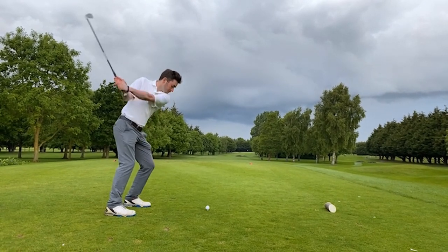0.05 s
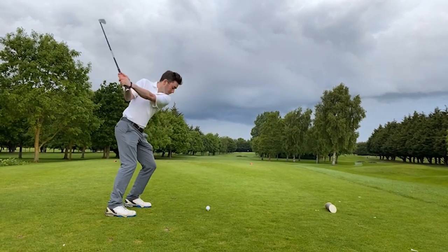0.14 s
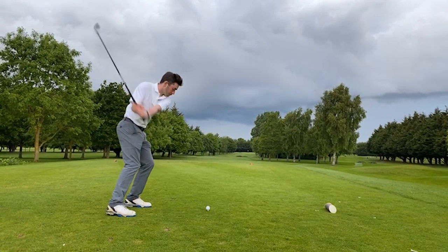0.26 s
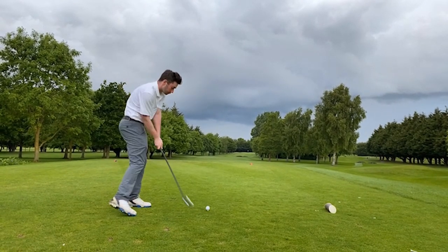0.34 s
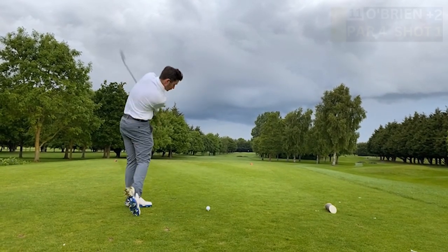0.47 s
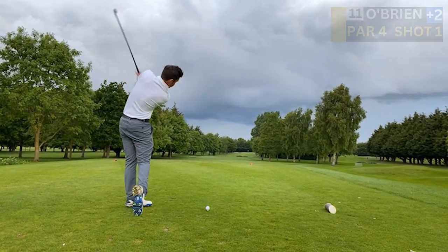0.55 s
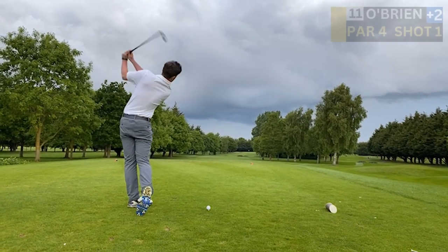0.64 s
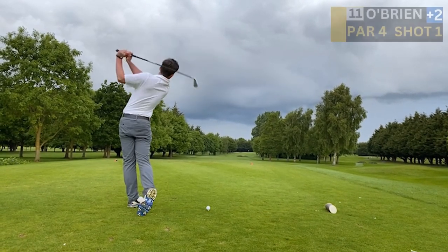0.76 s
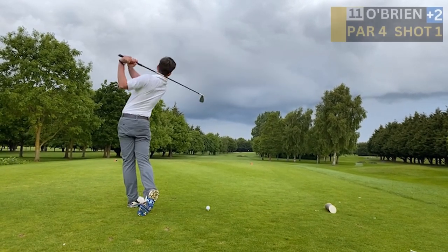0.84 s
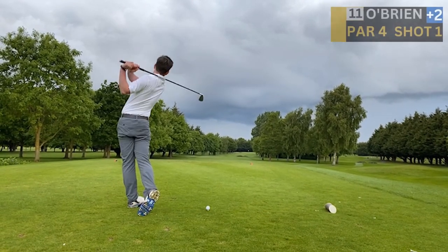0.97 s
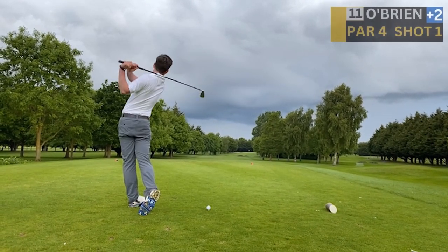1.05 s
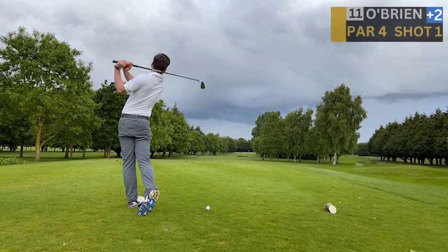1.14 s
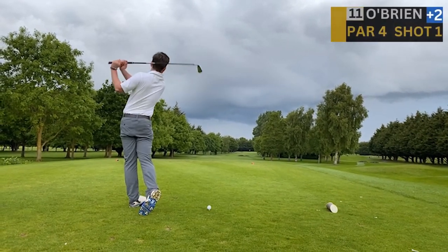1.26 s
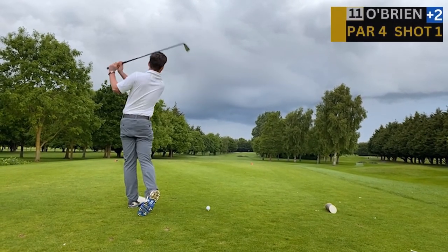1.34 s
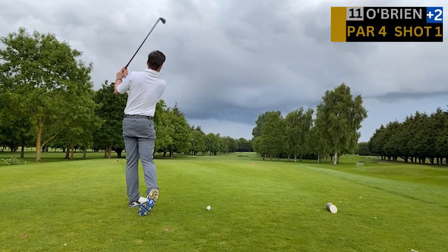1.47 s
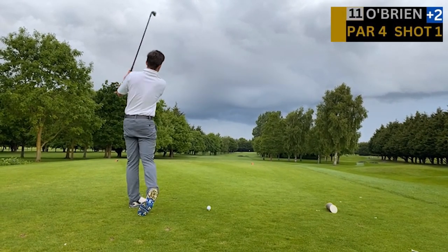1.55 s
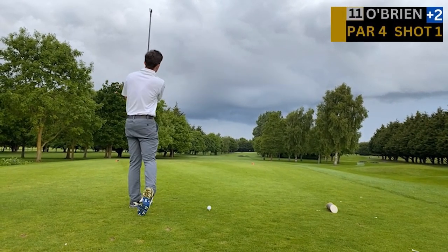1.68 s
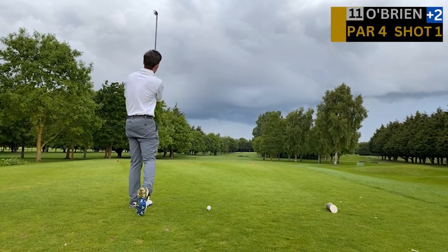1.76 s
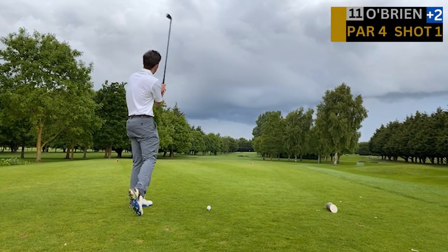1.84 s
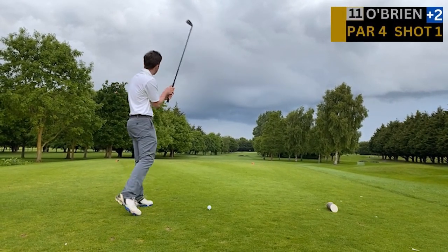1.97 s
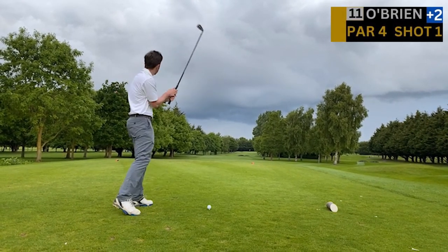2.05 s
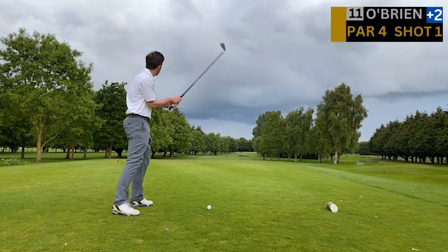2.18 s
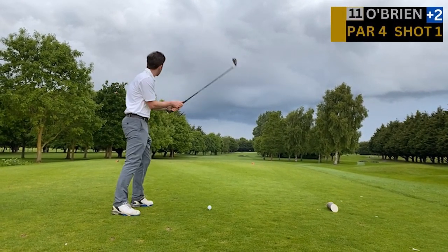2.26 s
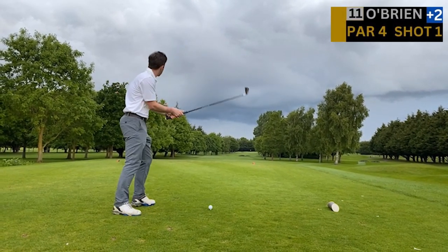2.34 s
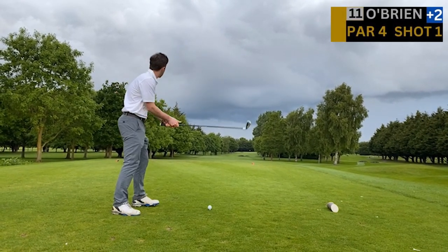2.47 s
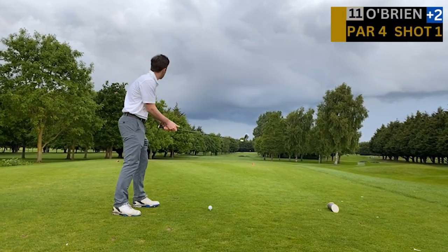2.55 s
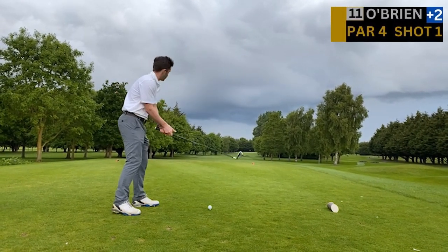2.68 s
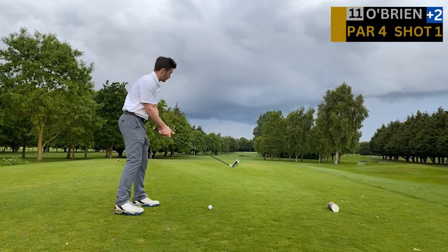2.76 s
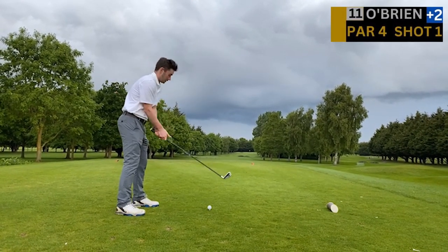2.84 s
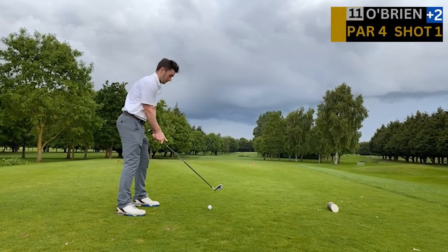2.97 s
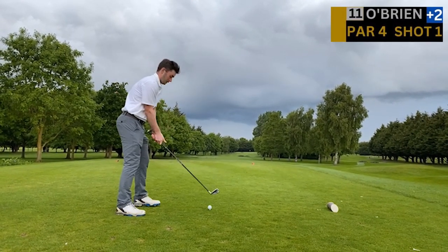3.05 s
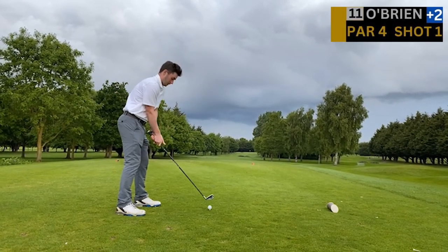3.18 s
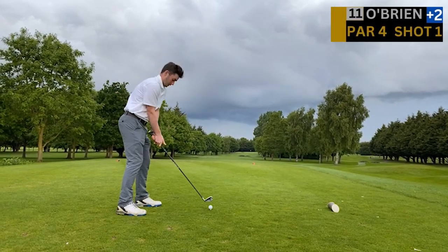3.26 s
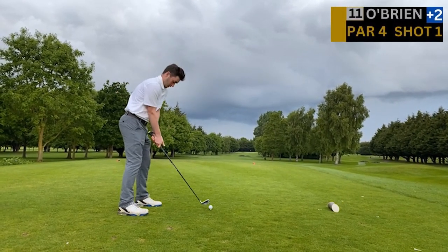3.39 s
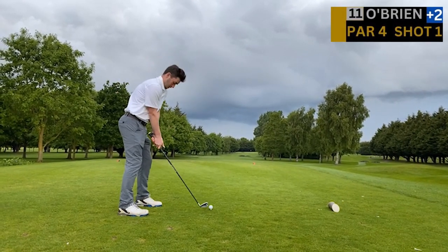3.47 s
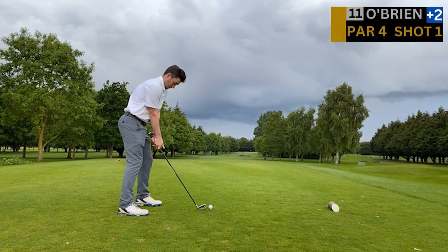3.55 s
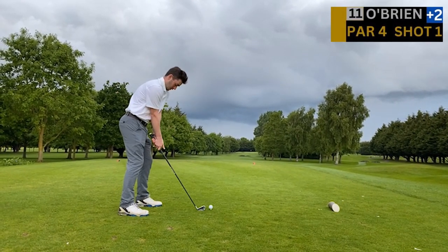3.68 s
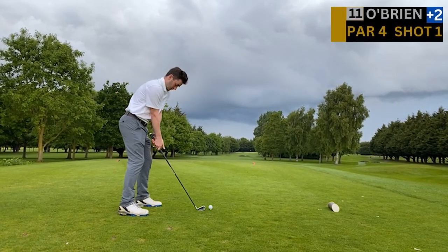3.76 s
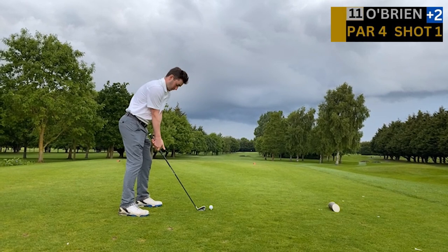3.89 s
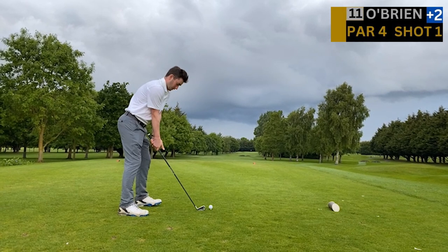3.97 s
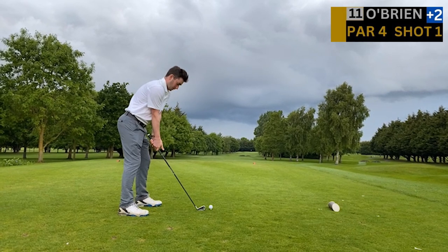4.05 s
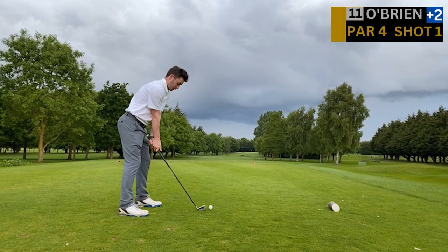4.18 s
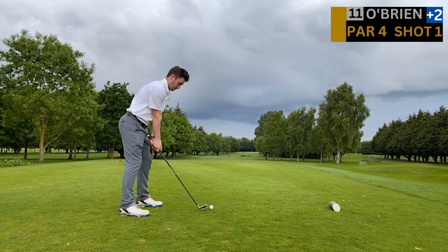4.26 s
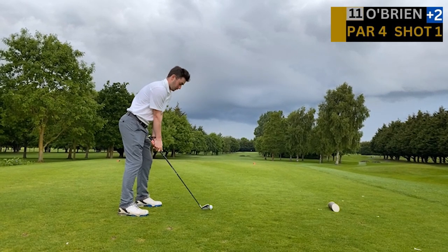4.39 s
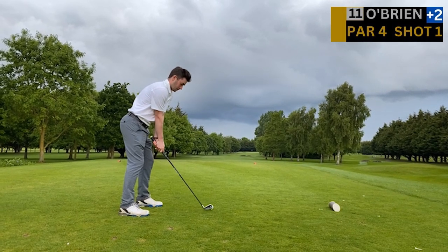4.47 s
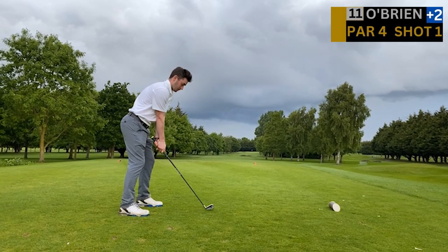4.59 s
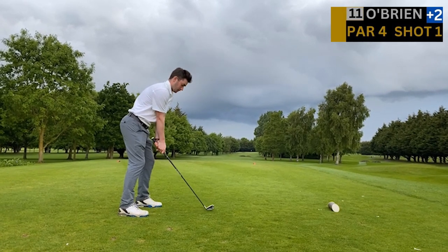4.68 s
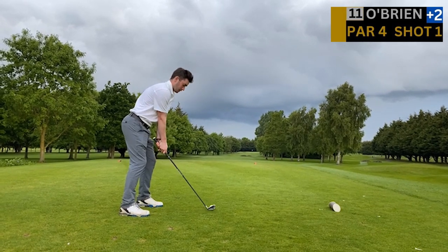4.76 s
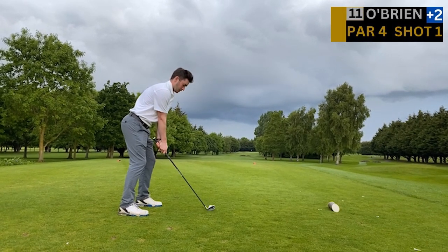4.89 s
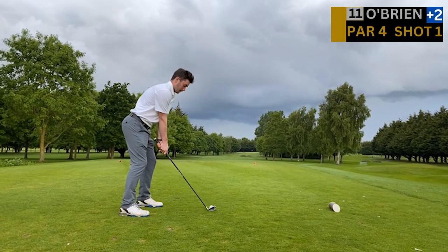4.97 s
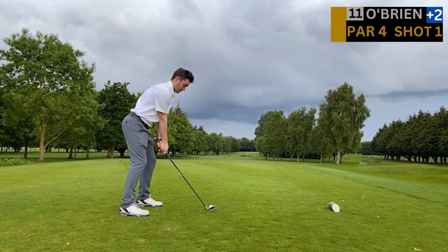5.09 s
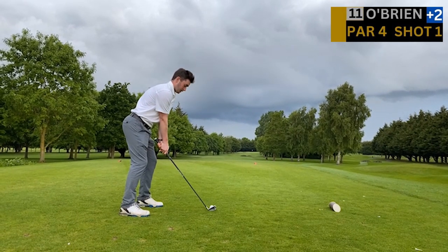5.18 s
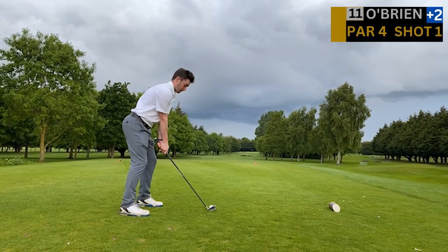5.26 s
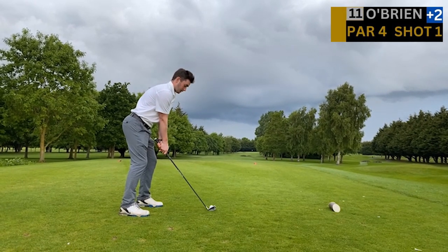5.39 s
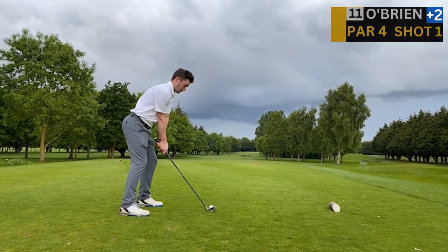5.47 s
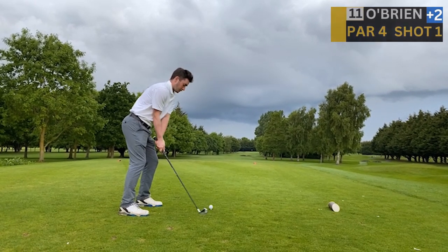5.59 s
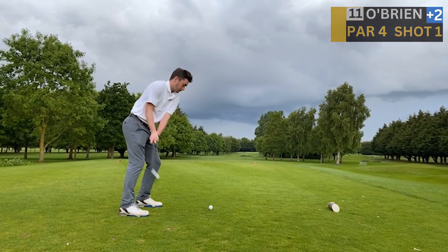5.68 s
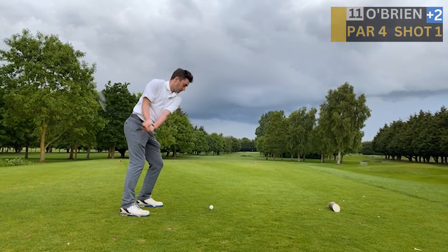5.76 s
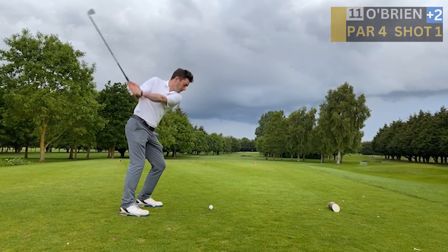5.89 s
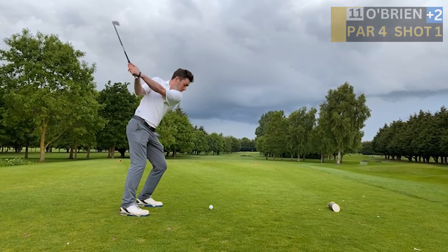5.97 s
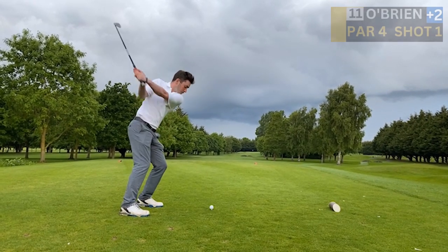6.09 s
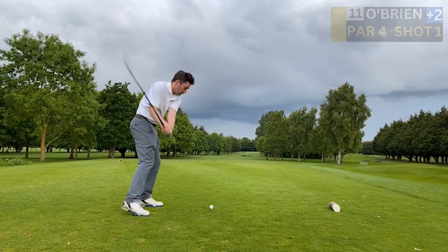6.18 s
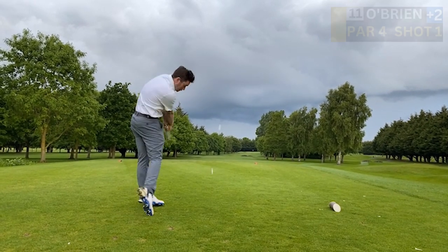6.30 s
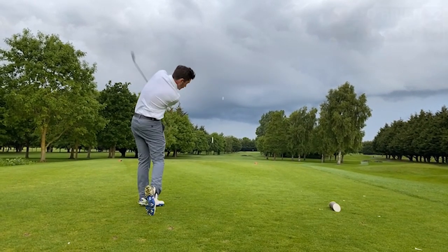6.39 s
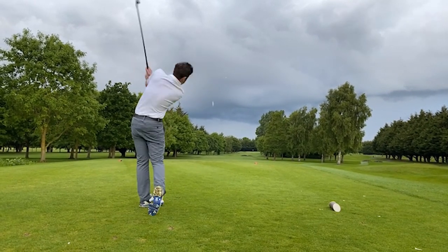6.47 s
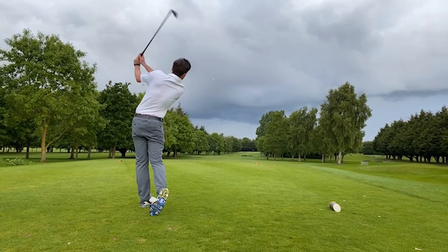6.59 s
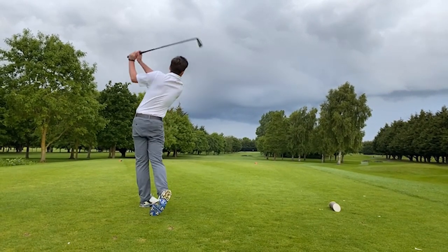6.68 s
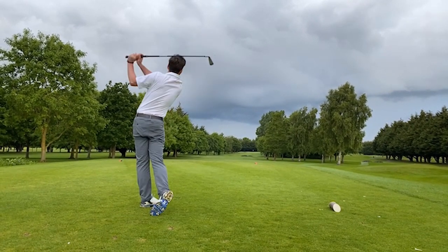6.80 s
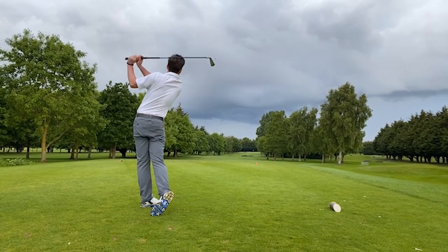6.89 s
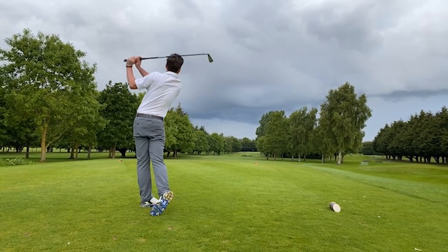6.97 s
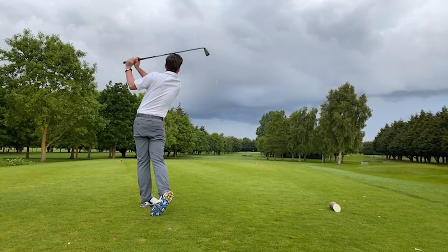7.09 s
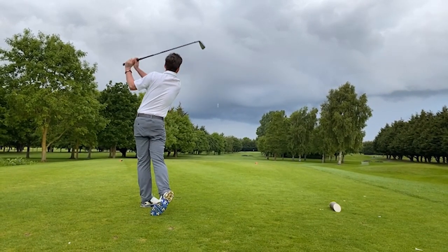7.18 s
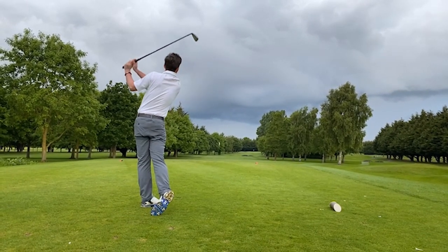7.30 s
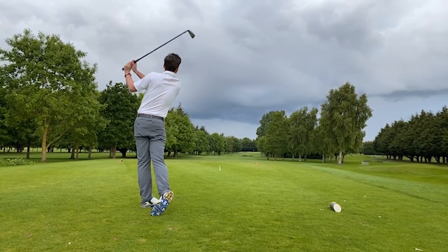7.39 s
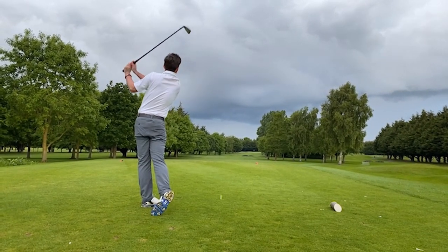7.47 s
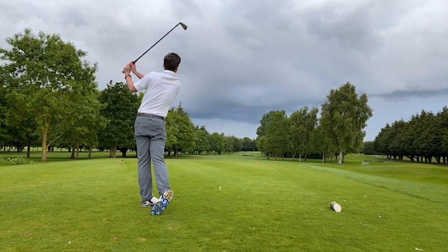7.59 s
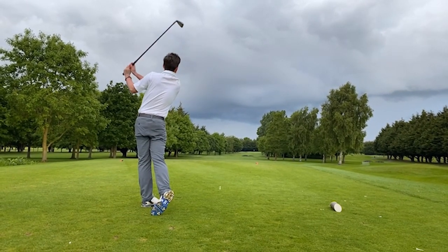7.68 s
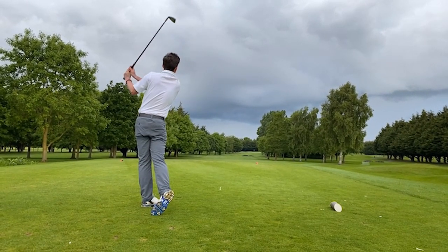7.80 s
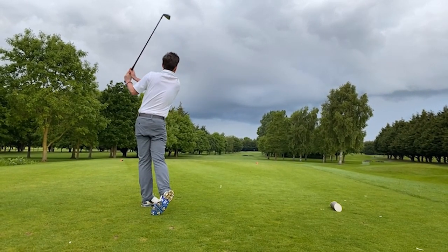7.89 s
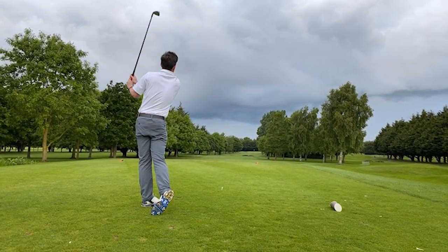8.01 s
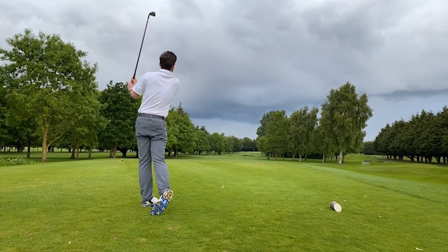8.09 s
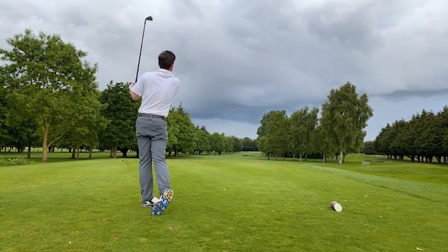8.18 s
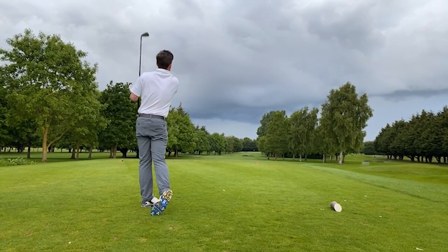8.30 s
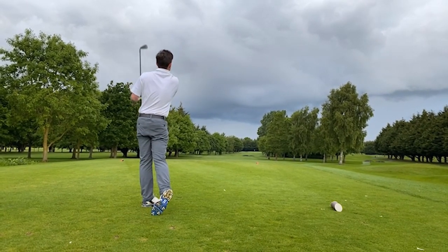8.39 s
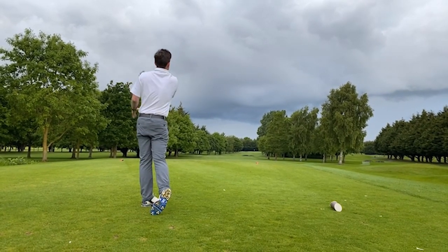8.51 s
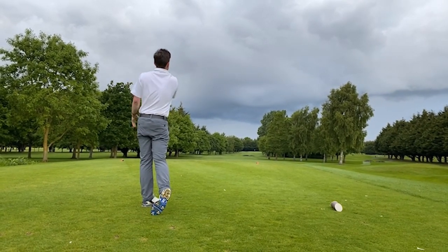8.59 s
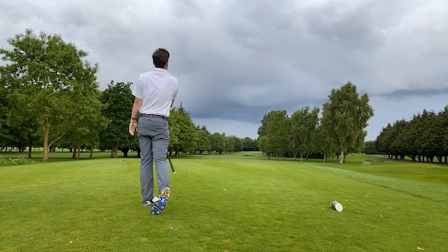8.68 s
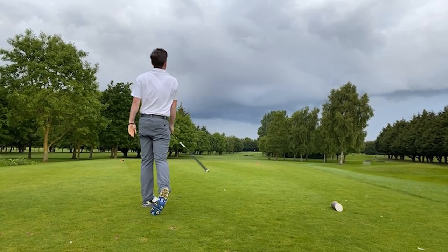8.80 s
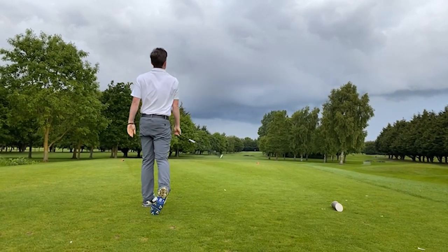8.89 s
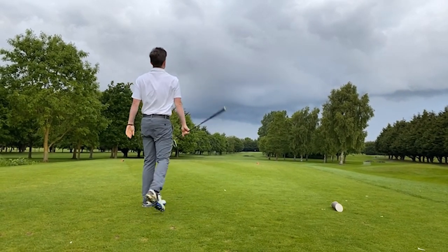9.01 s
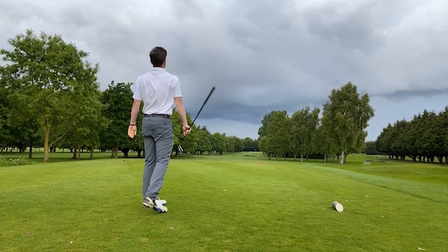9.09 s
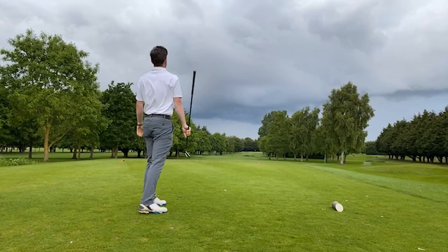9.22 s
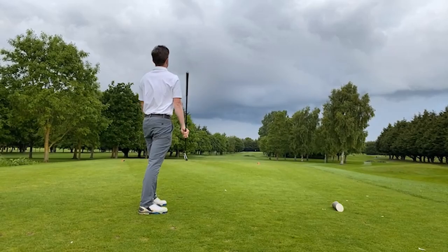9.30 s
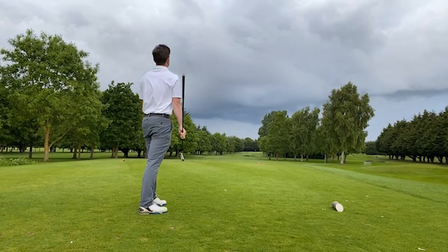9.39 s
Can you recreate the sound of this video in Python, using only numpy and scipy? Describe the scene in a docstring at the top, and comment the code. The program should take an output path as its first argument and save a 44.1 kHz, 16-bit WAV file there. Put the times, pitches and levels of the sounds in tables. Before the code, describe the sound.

Wind rumbles at the microphone over a birdsong-filled golf course; a brushed practice swing comes first, then a sharp iron strike with a short woody echo.

```python
"""Golf practice swing and iron shot

A golfer's practice swing brushes the turf, then an iron strikes a ball on a tree-lined course.
Wind is resonant low noise plus flickering leaf hiss; songbirds are bent sines smeared by the trees.
Each swing is a noise swell with a moving comb; turf, cloth and joints are short noise bursts.
The blow is a set of decaying modes with dull late copies and a grainy echo from the trees.
"""
import sys
import numpy as np
from scipy import signal
from scipy.io import wavfile
from scipy.ndimage import uniform_filter1d

SR = 44100
rng = np.random.default_rng(int(sys.argv[2]) if len(sys.argv) > 2 else 0)


def inscribe(sig):
    """Save sig as 16-bit PCM at rate SR to the path in sys.argv[1].

    A 1-D sig is mono; a 2-D sig holds one channel per row.
    Samples are clipped to [-1, 1] before scaling.
    """
    pcm = np.round(np.clip(np.atleast_2d(sig).T, -1, 1) * 32767)
    wavfile.write(sys.argv[1], SR, pcm.astype(np.int16))


N = 416744
T = np.arange(N) / SR


def undb(db):
    """Amplitude of a level in dB."""
    return 10 ** (np.asarray(db) / 20)


def unit(x):
    """Scale to rms 1."""
    return x / np.sqrt(np.mean(x ** 2))


def band(x, hz, width_hz):
    """Two-pole resonance, gain 1 at the centre."""
    return signal.lfilter(*signal.iirpeak(hz, hz / width_hz, SR), x)


def steep(x, hz, width_hz):
    """The same resonance twice, for steep skirts; rms 1."""
    return unit(band(band(x, hz, width_hz), hz, width_hz))


def noise():
    """White noise for the whole scene."""
    return rng.standard_normal(N)


def walk(rate_hz):
    """Random levels held 1 / rate_hz seconds and slewed twice; spread 1."""
    hold = int(SR / rate_hz)
    steps = np.repeat(rng.standard_normal(N // hold + 1), hold)
    return unit(uniform_filter1d(uniform_filter1d(steps, hold), hold)[:N])


def add(out, start_s, x):
    """Mix x into out at start_s."""
    i = int(start_s * SR)
    out[i:i + len(x)] += x[:N - i]


# wind strength before trims: (time [s], rumble level [dB], upper rumble level [dB], leaf level [dB])
WIND_LEVELS = [(0.0, -44, -45.5, -62.5), (0.37, -45, -45, -60), (0.73, -44.5, -50.5, -60),
               (1.32, -49.5, -54, -61.5), (1.66, -55, -58, -63), (2.16, -53, -59, -62),
               (2.66, -56, -57.5, -63), (3.92, -57, -58.5, -63.5), (5.0, -52, -55.5, -64),
               (5.31, -54.5, -52.5, -63.5), (6.29, -53, -53.5, -62), (6.84, -54.5, -56.5, -63.5),
               (7.21, -51, -55.5, -63.5), (7.53, -52.5, -50, -64), (8.13, -54.5, -54, -64),
               (8.42, -54.5, -51, -62), (8.95, -51, -51.5, -60), (9.45, -55, -52, -62)]
# low eddy resonances: (centre [Hz], first-pass width [Hz], relative level [dB])
RUMBLE_MODES = [(52, 20, -4), (70, 35.8, 0)]
# upper eddy resonances: (centre [Hz], first-pass width [Hz], relative level [dB])
BUFFET_MODES = [(118.3, 51, 3.5), (171, 61, -10.5)]
# leaf hiss spectrum: (frequency [Hz], relative density [dB per Hz])
LEAF_SPECTRUM = [(130, -29), (220, -0.5), (314, -14), (389, 0.5), (536, -9), (898, -6.5), (1150, -15),
                 (2110, -27), (2760, -24.5), (6030, -34), (7880, -30.5), (8930, -36.5), (11700, -40),
                 (15500, -60.5)]


def eddies(modes):
    """Noise through a sum of low resonances; rms 1."""
    out = 0
    for hz, width_hz, db in modes:
        out = out + undb(db) * unit(band(band(noise(), hz, width_hz), hz, 1.4 * width_hz))
    return unit(out)


def wind():
    """Eddies at the microphone port give two steep low bands; leaves hiss in third-octaves that flicker alone."""
    s, *columns = np.transpose(WIND_LEVELS)
    low_db, upper_db, leaf_db = (np.interp(T, s, c) for c in columns)
    hz, density_db = np.transpose(LEAF_SPECTRUM)
    leaves = 0
    for centre_hz in 230 * 2 ** np.arange(0, 6.1, 1 / 3):
        # far treble hardly follows the gusts
        gust = np.clip(1.3 - 0.29 * np.log2(centre_hz / 230), 0, 1)
        level_db = np.interp(np.log(centre_hz), np.log(hz), density_db)
        level_db = level_db + gust * (leaf_db - leaf_db.mean()) + 1.4 * walk(9)
        width_hz = centre_hz / 3
        leaves = leaves + undb(level_db) * band(band(noise(), centre_hz, width_hz), centre_hz, width_hz)
    low = eddies(RUMBLE_MODES) * undb(low_db + 4.5)
    upper = eddies(BUFFET_MODES) * undb(upper_db + 2.5)
    return low + upper + unit(leaves) * undb(leaf_db.mean() - 0.57)


def whistle(length_s, hz, rough_hz, edge_s):
    """A sine bent through three pitches; rough_hz shakes the pitch quickly."""
    u = np.linspace(-1, 1, int(length_s * SR))
    start, middle, end = hz
    pitch_hz = middle + (end - start) / 2 * u + ((start + end) / 2 - middle) * u ** 2
    shake = unit(uniform_filter1d(rng.standard_normal(SR // 2), size=100))[:len(u)]
    fade = np.clip((1 - abs(u)) * length_s / edge_s, 0, 1)
    return np.sqrt(2) * fade * np.sin(2 * np.pi * np.cumsum(pitch_hz + rough_hz * shake) / SR)


# whistled notes: (time [s], length [s], start [Hz], middle [Hz], end [Hz], level before trim [dB])
BIRD_NOTES = [(.213, 0.027, 2900, 2590, 2670, -75), (.61, 0.07, 2660, 2440, 2460, -74),
              (.765, .03, 2750, 2600, 2500, -78), (1.384, 0.038, 6760, 5600, 4200, -77),
              (1.39, .022, 3300, 3900, 4500, -72.5), (1.526, .028, 3080, 3850, 4080, -69),
              (1.566, 0.034, 6000, 6330, 6190, -76), (1.593, .027, 5790, 4800, 4180, -69.5),
              (1.796, .055, 5870, 5950, 5950, -81), (1.815, .03, 3700, 4300, 3700, -78),
              (1.946, .014, 4300, 3700, 3100, -71), (1.957, 0.03, 3100, 3420, 3250, -68.5),
              (1.984, .026, 3270, 4960, 3000, -69.5), (2.103, 0.028, 3980, 3550, 3700, -66.5),
              (2.369, 0.042, 3650, 3670, 3600, -69.5), (2.393, .071, 2360, 2370, 2340, -76.5),
              (2.42, .08, 2950, 2900, 2840, -79), (2.47, .034, 4340, 4180, 4100, -78),
              (2.5, .1, 3400, 3390, 3330, -78), (2.56, .033, 4240, 4090, 4060, -80),
              (2.647, .039, 3490, 3470, 3260, -79), (2.838, 0.041, 5900, 4600, 5800, -73),
              (2.88, 0.15, 2450, 2490, 2770, -79), (3.066, 0.026, 5730, 5250, 5600, -69),
              (3.088, .025, 5620, 5100, 5400, -70), (3.234, 0.092, 6300, 6200, 6130, -80),
              (3.257, 0.022, 4880, 4550, 4680, -68), (3.304, 0.021, 4600, 4020, 4710, -74),
              (3.333, 0.031, 5440, 5520, 5600, -74), (3.409, .02, 5400, 4970, 5100, -71),
              (3.446, .02, 5280, 4850, 5000, -71), (3.46, .022, 3300, 3820, 4300, -77),
              (3.471, 0.095, 6000, 6100, 6100, -82), (3.515, .04, 6000, 6400, 6600, -77),
              (3.548, 0.02, 5500, 4950, 4750, -72), (3.621, 0.028, 5280, 5500, 5430, -74),
              (3.745, .04, 3200, 3500, 3600, -78), (3.831, 0.4, 6010, 5990, 6000, -79.5),
              (3.95, .018, 3700, 4100, 4400, -72), (4.072, .03, 3200, 3770, 4340, -74.5),
              (4.187, 0.031, 3860, 4400, 5250, -71), (4.316, 0.022, 5500, 5200, 4750, -72),
              (4.379, .027, 5070, 4680, 5260, -72), (4.405, .034, 4300, 5400, 6300, -79),
              (4.439, .04, 8600, 8160, 7900, -79), (4.534, .027, 4100, 4800, 5600, -77),
              (4.565, .023, 4500, 4650, 4400, -72), (4.68, .035, 4280, 5500, 6700, -80),
              (4.7, .023, 4400, 4600, 4340, -73.5), (4.734, .036, 8100, 7630, 7750, -80),
              (4.905, .029, 7190, 6410, 6200, -78), (4.956, .07, 9000, 7400, 4800, -79.5),
              (5.068, .037, 7390, 6900, 6170, -79), (5.09, .032, 6490, 5900, 5400, -76),
              (5.184, .04, 6700, 6000, 5100, -74), (5.23, .046, 7020, 5680, 5730, -82),
              (5.291, .045, 5400, 4930, 4450, -70), (5.41, 0.057, 5900, 5250, 4900, -73),
              (5.492, .04, 8600, 8060, 7900, -80), (5.55, .04, 5800, 5400, 4900, -76),
              (5.56, .055, 7910, 8100, 7990, -81), (5.9, .062, 8790, 8300, 7880, -83),
              (6.378, .025, 3210, 3220, 3180, -69), (6.478, .025, 4000, 4000, 4010, -72),
              (6.491, .025, 3230, 3220, 3200, -65), (6.6, .05, 2870, 3250, 2600, -69),
              (7.22, .02, 4020, 4040, 3850, -75), (7.31, .032, 4450, 4020, 3970, -78),
              (7.755, .04, 3400, 3600, 3900, -80), (8.183, .017, 3600, 4000, 4400, -73.5),
              (8.298, 0.029, 3300, 3700, 4200, -70), (8.39, 0.028, 3750, 4270, 4750, -67),
              (8.42, .07, 4800, 4600, 4490, -78), (9.434, .02, 3340, 4090, 4000, -69)]


def bird_notes(out):
    """Single whistles, each one bent sine."""
    for s, length_s, *hz, db in BIRD_NOTES:
        rough_hz = 200 if hz[1] > 7500 else 70  # the highest singers are far and buzzy
        add(out, s, undb(db - 0.8) * whistle(length_s, hz, rough_hz, .006))


# warbles: (time [s], length [s], first base [Hz], last base [Hz], arch height [Hz], level [dB], arches)
WARBLE_RUNS = [(2.072, 0.028, 4100, 3920, 1090, -70, 2), (2.122, .045, 3470, 3500, 1000, -67, 3),
               (2.17, .04, 3740, 3900, 100, -76, 2), (2.215, .037, 3900, 3700, 800, -75, 3),
               (2.249, .044, 3600, 3100, 550, -67, 2), (2.3, .07, 3550, 3580, 250, -79, 3),
               (2.403, .071, 3390, 3150, 200, -77, 3)]


def warbles(out):
    """Runs of arched, slightly overlapping notes on a moving base pitch."""
    for s, length_s, first_hz, last_hz, arch_hz, db, count in WARBLE_RUNS:
        base_hz = np.linspace(first_hz, last_hz, round(count) + 1)
        step_s = length_s / count
        for k in range(round(count)):
            hz = [base_hz[k], base_hz[k] + arch_hz, base_hz[k + 1]]
            add(out, s + k * step_s, undb(db) * whistle(1.1 * step_s, hz, 110, 0.0026))


# repeated two-note figures: (first time [s], period [s], repeats, notes), each note
# (offset [s], length [s], start [Hz], middle [Hz], end [Hz], level at the loudest point [dB])
FIGURE_RUNS = [(4.505, .134, 7, [(.003, .028, 2780, 3020, 2720, -69.5),
               (.082, .035, 3050, 3400, 3100, -78.5)]), (5.735, .163, 3, [(0, .035, 3350, 3250, 3150, -73),
               (.039, .065, 2980, 2880, 2900, -70)])]
FIGURE_SWELL_DB = 3


def figures(out):
    """Two-note figures repeated evenly, loudest late in the run."""
    for s, every_s, repeats, notes in FIGURE_RUNS:
        softest_first = sorted(notes, key=lambda n: n[-1])
        for k, u in enumerate(np.linspace(-1, 1, round(repeats))):
            swell_db = -FIGURE_SWELL_DB * (u - .4) ** 2
            # the softer note is blurred
            for (offset_s, length_s, *hz, db), rough_hz in zip(softest_first, (150, 50)):
                note = whistle(length_s, hz, rough_hz, .008)
                add(out, s + k * every_s + offset_s, undb(db + swell_db) * note)


# hoarse calls: (time [s], length [s], start [Hz], middle [Hz], end [Hz],
# upper voice above lower [Hz], lower voice level [dB])
RASP_CALLS = [(2.013, 0.18, 6950, 6680, 6830, 906, -75), (7.594, .15, 7300, 6600, 6000, 950, -70.5),
              (7.722, 0.042, 6200, 5700, 5350, 1300, -69.5), (7.863, 0.072, 7540, 7170, 6700, 883, -72.5),
              (7.915, 0.094, 7300, 6610, 6480, 1137, -67.5)]


def rasps(out):
    """Both halves of the syrinx sound at once, a fixed interval in Hz apart."""
    for s, length_s, *hz, above_hz, db in RASP_CALLS:
        lower = whistle(length_s, hz, 125, 0.053)
        upper = whistle(length_s, np.add(hz, above_hz), 125, 0.042)
        add(out, s, undb(db) * (lower + undb(-1.2) * upper))


# thin far song before note-level scatter: (time [s], level [dB])
TRILL_LEVELS = [(0, -82), (1.3, -88), (2.3, -93), (2.8, -84), (3.8, -86), (4.1, -106), (4.5, -89),
                (5.9, -88), (6.5, -93.5), (7.2, -84.5), (8.3, -89), (8.7, -91), (9, -85.5), (9.45, -89)]
# low far piping before note-level scatter: (time [s], level [dB])
PIPE_LEVELS = [(0, -87), (1.2, -91), (3, -85), (5.5, -94.5), (7.2, -87), (9.45, -94)]


def far_song():
    """One far bird repeats a falling note about seven times a second, another pipes notes of changing pitch."""
    trill, pipe = np.zeros((2, N))
    for k, (late, high, loud, low, soft) in enumerate(rng.standard_normal((66, 5))):
        trill_hz = np.array([8700, 8000, 7600]) * (1 + 0.027 * high)
        pipe_hz = np.array([2750, 2650, 2600]) * (1 + .2 * abs(late))
        trill_note = undb(1.5 + 2 * loud) * whistle(0.075, trill_hz, 380, .045)
        pipe_note = undb(1.5 * soft) * whistle(.09, pipe_hz, 180, .03)
        add(trill, 0.034 + k * .143 + 0.0091 * late, trill_note)
        add(pipe, .06 + k * .143 + .015 * low, pipe_note)
    trill_db, pipe_db = (np.interp(T, *np.transpose(rows)) for rows in (TRILL_LEVELS, PIPE_LEVELS))
    return trill * undb(trill_db) + pipe * undb(pipe_db)


CHATTER_MIN_DB, CHATTER_SPREAD_DB = -89, 5.6


def chatter(out):
    """Faint quick chirps from many distant birds, at random times and pitches."""
    for when, pitch, bend, loud in rng.random((130, 4)):
        hz = (3000 + 3500 * pitch) * (1 + .25 * (bend - .5) * np.array([-1, .3, 1]))
        gain = undb(CHATTER_MIN_DB + CHATTER_SPREAD_DB * loud)
        add(out, 1.3 + when * 4.6, gain * whistle(.03, hz, 80, 0.014))


TREES_T60_S, TREES_DB = .6, -5


def birds():
    """All birdsong plus its reflections off the trees, a convolved decaying noise tail."""
    out = np.zeros(N)
    for sing in (bird_notes, warbles, figures, rasps, chatter):
        sing(out)
    out = out + far_song()
    t = T[:SR // 2]
    tail = rng.standard_normal(len(t)) * 1000. ** (-t / TREES_T60_S) * np.minimum(t / .015, 1)
    return out + undb(TREES_DB) * signal.fftconvolve(out, tail / np.linalg.norm(tail))[:N]


# club head through air: (lowest point [s], level before grass copy [dB], treble relative to it [dB])
SWING_PASSES = [(.372, -51, -17), (6.257, -46, -16)]
SWELL_S, FADE_DB_PER_S, BRIGHTEN_DB_PER_S = .032, 259.5, 110.5
# extra path via the grass, at the lowest point, and its rate of shrinking before that
GRASS_PATH_M, GRASS_CLOSING_M_PER_S, SWING_SPAN_S = .27, 6, .13


def swings():
    """Vortex noise of shaft and head; its copy off the grass draws comb lines that climb as the head drops."""
    out = 0
    for s, peak_db, treble_db in SWING_PASSES:
        t = T - s
        swell = 1 / (1 + (t / SWELL_S) ** 2) ** 1.5
        fade = undb(-FADE_DB_PER_S * np.maximum(t, 0))
        gain = undb(peak_db) * np.where(t < 0, swell, fade) * (abs(t) < .3)
        air = unit(steep(noise(), 2000, 2300) + undb(2.5) * steep(noise(), 520, 400))
        bright_db = treble_db + BRIGHTEN_DB_PER_S * np.clip(t, 0, SWING_SPAN_S)
        air = air + undb(bright_db) * steep(noise(), 7500, 9000)
        path_m = GRASS_PATH_M + GRASS_CLOSING_M_PER_S * np.clip(-t, 0, SWING_SPAN_S)
        lag_samples = path_m / 343 * SR  # speed of sound 343 m/s
        grass_copy = np.interp(np.arange(N) - lag_samples, np.arange(N), air)
        out = out + gain * (air + .6 * grass_copy)
    return out


# turf scuffs, cloth and joint clicks: (time [s], peak level [dB], centre [Hz],
# width before 1.13x widening [Hz], rise of two e-folds [ms], t60 [ms])
SCUFF_BURSTS = [(.397, -42, 9000, 6000, 4, 25), (.398, -31.5, 2000, 1100, 2.6, 15),
                (.399, -36, 500, 500, 14, 45), (.432, -58, 2300, 1500, 25, 120),
                (.478, -63, 8000, 8000, .6, 15), (.48, -70, 8000, 9000, 30, 120),
                (.492, -65, 3000, 4000, .6, 15), (.575, -61, 1700, 2200, 40, 250),
                (.8458, -54, 3100, 1300, .3, 20), (5.949, -48.5, 3100, 3440, .3, 18),
                (8.841, -57, 9450, 7000, .6, 15), (8.93, -69, 2500, 2500, 50, 150),
                (9.116, -56.5, 1400, 1300, 4, 60), (9.126, -58, 2000, 1800, 1.2, 21)]
CRUMBS_START_S, CRUMBS_SPAN_S, CRUMBS_MIN_DB, CRUMBS_SPREAD_DB = 0.36, .17, -69.5, 6


def scuffs():
    """Short noise bursts that swell, then fall; soil thrown by the practice swing patters down at random."""
    out = np.zeros(N)
    t = np.arange(-2000, 4000) / SR
    crumbs = []
    for when, loud, pitch in rng.random((12, 3)):
        s = CRUMBS_START_S + CRUMBS_SPAN_S * when
        db = CRUMBS_MIN_DB + CRUMBS_SPREAD_DB * loud
        crumbs.append((s, db, 2000 + 4000 * pitch, 4000, .6, 15))
    for s, db, hz, width_hz, rise_ms, t60_ms in SCUFF_BURSTS + crumbs:
        shape = np.where(t < 0, np.exp(t * 2000 / rise_ms), 1000. ** (-t * 1000 / t60_ms))
        burst = steep(rng.standard_normal(len(t)), hz, 1.13 * width_hz)
        add(out, s + t[0], undb(db) * shape * burst)
    return out


# the blow: (time [s], gain on the ring [dB])
STRIKE_S, STRIKE_DB = (6.27565, -13)
# ball and face modes: (frequency [Hz], t60 [ms], relative level [dB])
IRON_MODES = [(190, 40, -7), (390, 16, -5.5), (620, 11, -4.5), (1120, 7, -2.5), (1590, 6.3, -1),
              (2030, 7.2, 2), (2520, 8, -3), (3130, 12, -7), (5560, 6, -6.5), (7570, 6, -5.5),
              (10600, 2.8, -7.5)]
# off the ground, then the sole meets the turf: (delay [ms], relative level [dB], lowpass corner [Hz])
GROUND_COPIES = [(2.42, -1, 13890), (4.2, -7, 3000)]


def strike():
    """Contact rings ball and face, crackles, and arrives again duller off the ground and the turf."""
    t = T[:SR // 10]
    ring = 0
    for k, (hz, t60_ms, db) in enumerate(IRON_MODES):
        sign = (-1) ** k  # neighbouring modes swing in opposite senses at the listener
        ring = ring + sign * undb(db) * np.sin(2 * np.pi * hz * t) * 1000. ** (-t * 1000 / t60_ms)
    crackle = undb(-10) * steep(noise(), 4000, 8400)[:len(t)] * np.exp(-t / .002)
    ring = -(ring + crackle) * (1 - np.exp(-t / .0001))  # the ball squashes before it rings
    out = np.zeros(N)
    add(out, STRIKE_S, undb(STRIKE_DB) * ring)
    for delay_ms, db, top_hz in GROUND_COPIES:
        dull = signal.lfilter(*signal.butter(1, top_hz, fs=SR), ring)
        add(out, STRIKE_S + delay_ms / 1000, undb(STRIKE_DB + db) * dull)
    return out


# nearest crowns, then the far wood: (level [dB], t60 [s], treble relative to body [dB])
ECHO_DECAYS = [(-52, .12, 3.5), (-56, .95, -3.5)]
ECHO_DELAY_S, ECHO_RISE_S = .033, .007


def strike_echo():
    """Trunks and crowns at many distances send the blow back as a grainy wash."""
    late_s = np.maximum(T - STRIKE_S - ECHO_DELAY_S, 0)
    rise = 1 - np.exp(-late_s / ECHO_RISE_S)
    body = rise * sum(undb(db - 60 * late_s / t60_s) for db, t60_s, _ in ECHO_DECAYS)
    treble = rise * sum(undb(db + top_db - 60 * late_s / t60_s) for db, t60_s, top_db in ECHO_DECAYS)
    wash = undb(2.5 * walk(40)) * steep(noise(), 1900, 2600)
    wash = wash + undb(-5 + 2.5 * walk(30)) * steep(noise(), 3800, 1400)
    hiss = undb(1.8 * walk(60) + 1.8 * walk(25)) * steep(noise(), 8000, 8000)
    return body * wash + treble * hiss


def scene():
    """Sum of all sources, one channel."""
    return (wind() + birds() + swings() + scuffs() + strike() + strike_echo())[None]


TOP_HZ = 15700


def record(dry):
    """The microphone drops the deepest bass and the top is cut."""
    x = signal.sosfilt(signal.butter(3, 36, "high", fs=SR, output="sos"), dry)
    return signal.sosfilt(signal.ellip(8, .2, 70, TOP_HZ, fs=SR, output="sos"), x)


dry = scene()
out = record(dry)
inscribe(out)
```